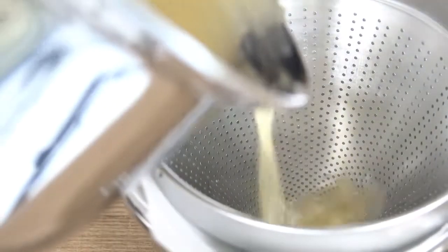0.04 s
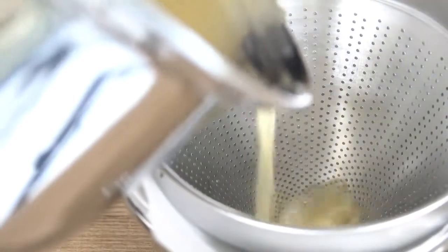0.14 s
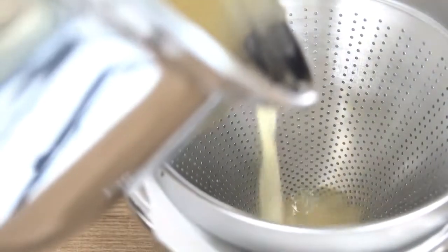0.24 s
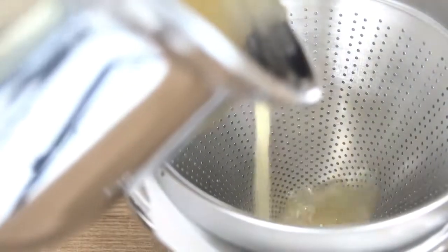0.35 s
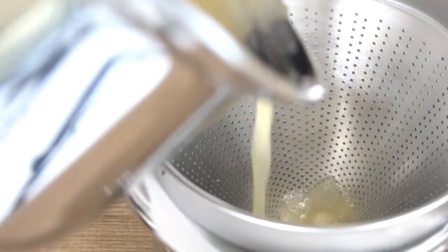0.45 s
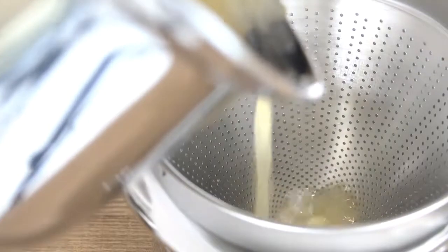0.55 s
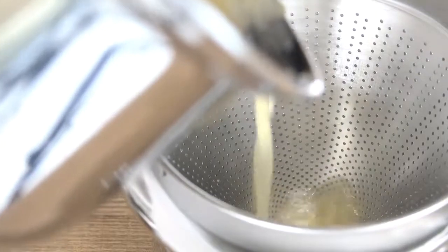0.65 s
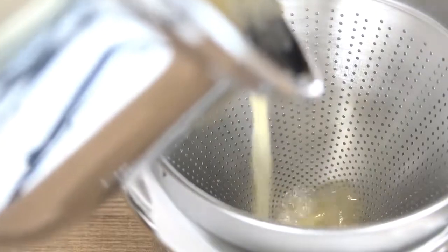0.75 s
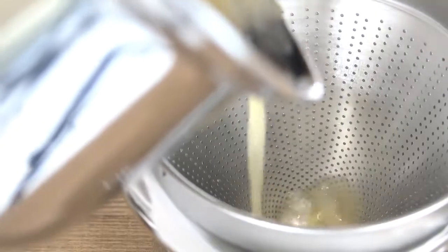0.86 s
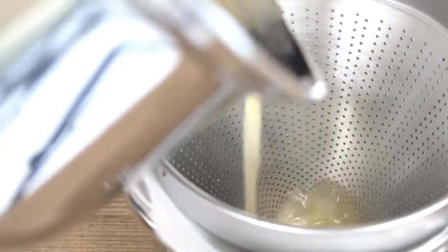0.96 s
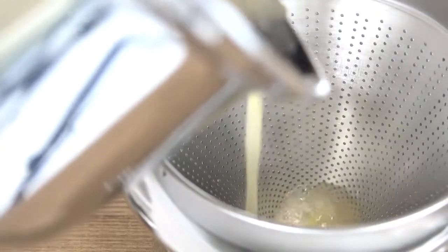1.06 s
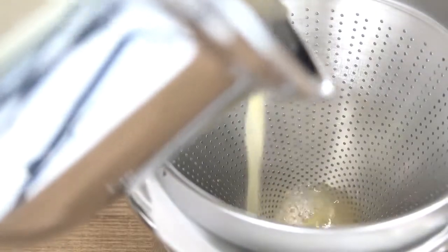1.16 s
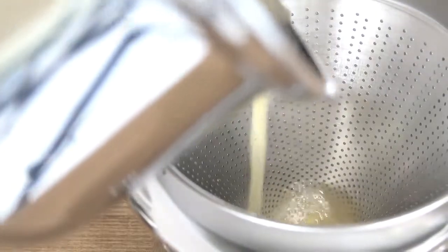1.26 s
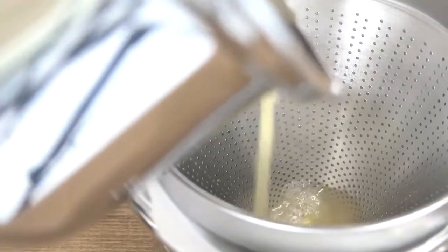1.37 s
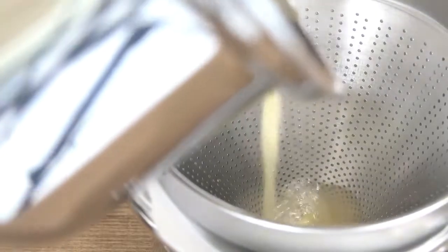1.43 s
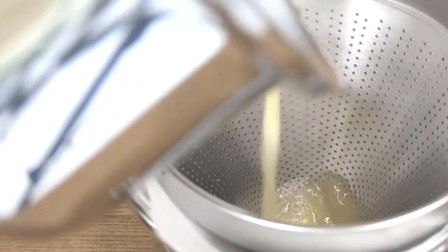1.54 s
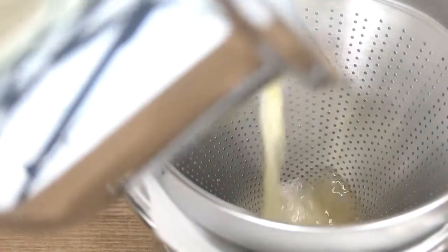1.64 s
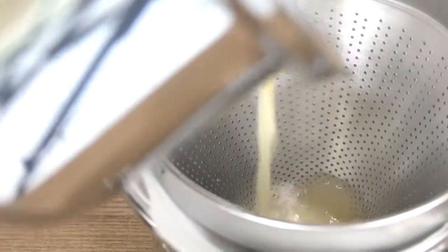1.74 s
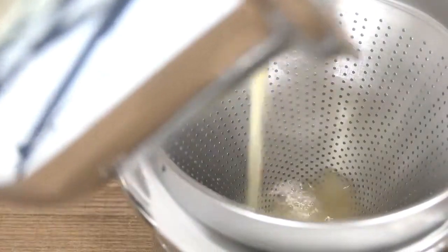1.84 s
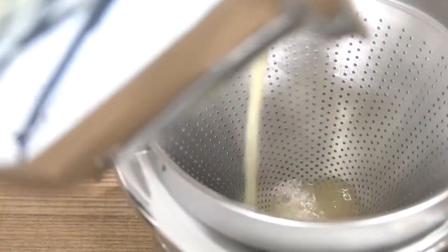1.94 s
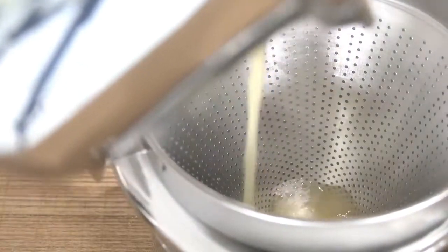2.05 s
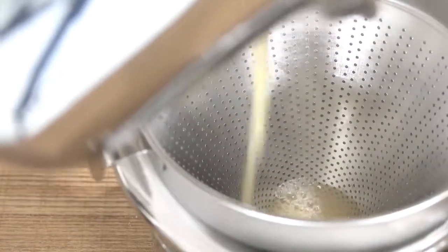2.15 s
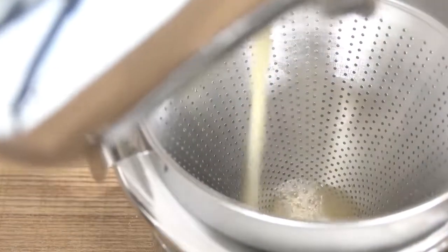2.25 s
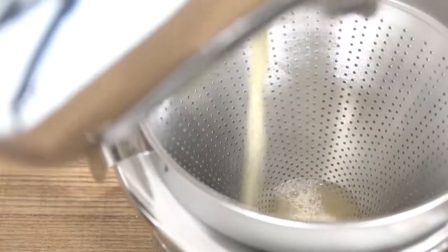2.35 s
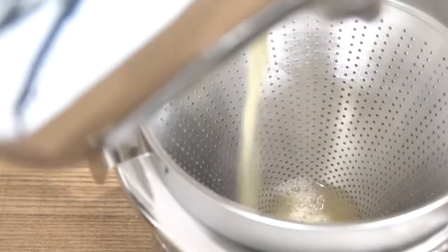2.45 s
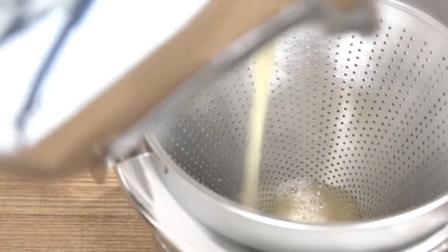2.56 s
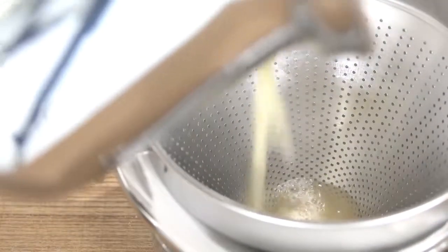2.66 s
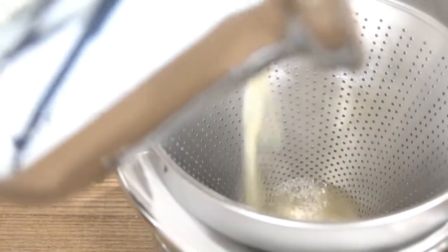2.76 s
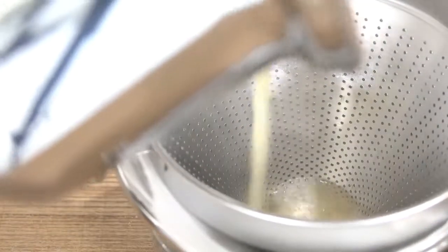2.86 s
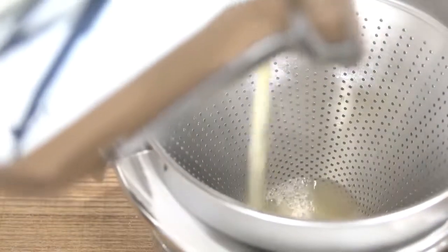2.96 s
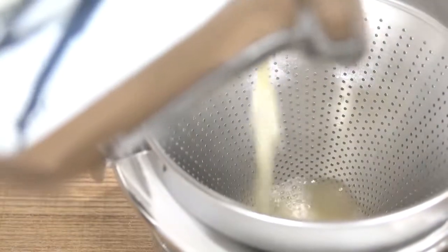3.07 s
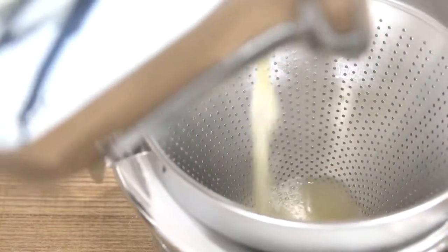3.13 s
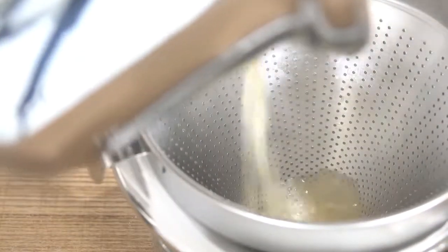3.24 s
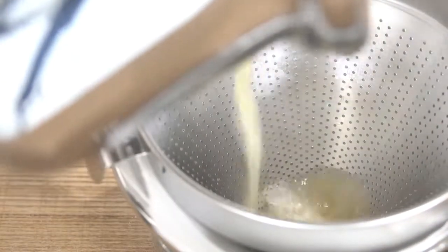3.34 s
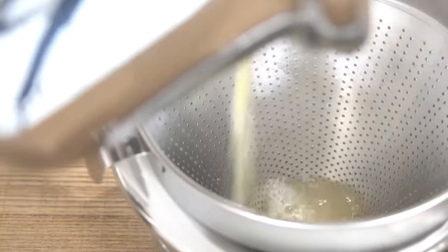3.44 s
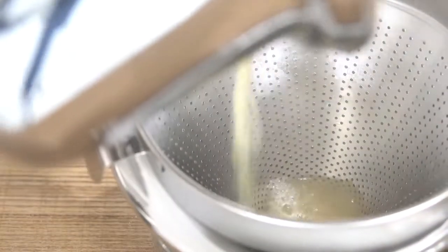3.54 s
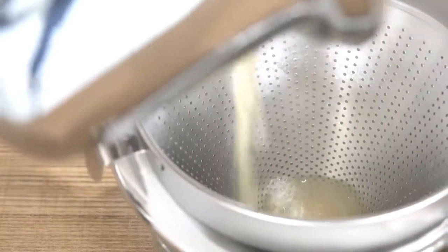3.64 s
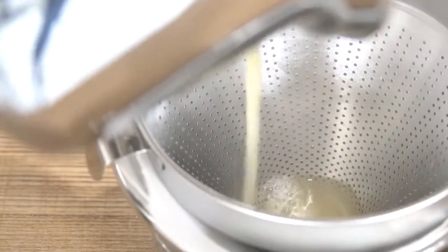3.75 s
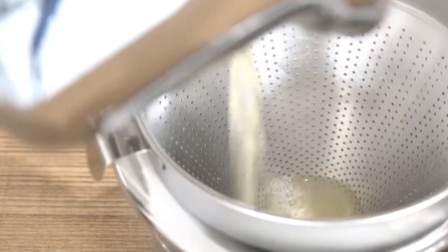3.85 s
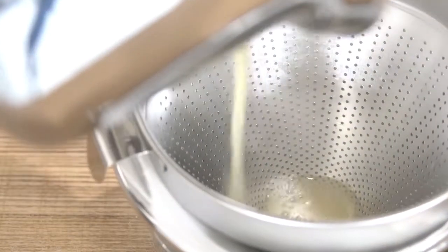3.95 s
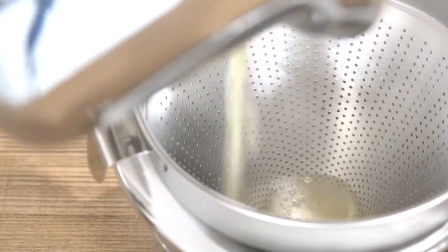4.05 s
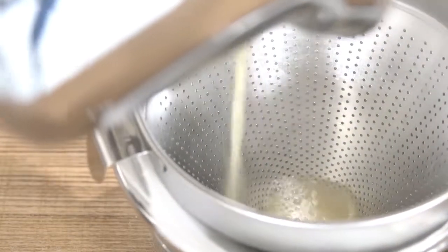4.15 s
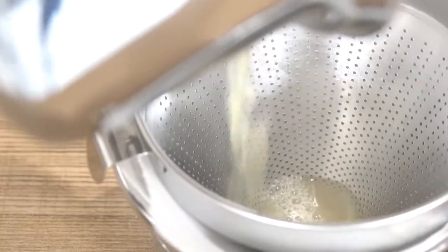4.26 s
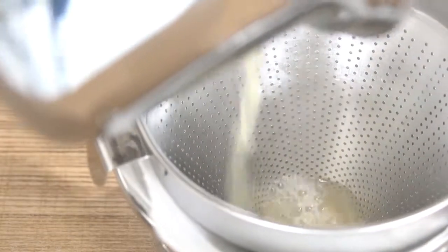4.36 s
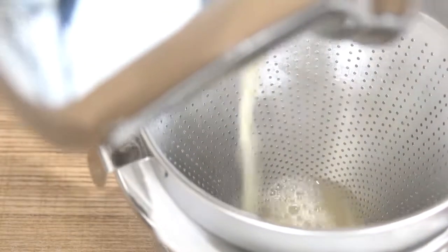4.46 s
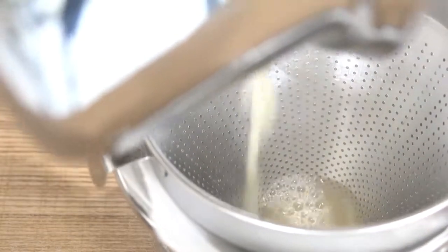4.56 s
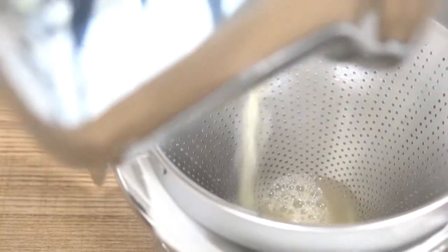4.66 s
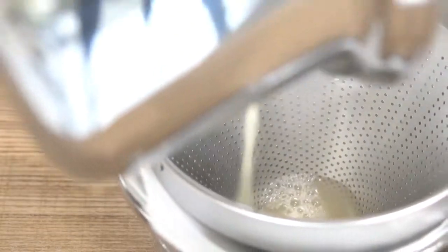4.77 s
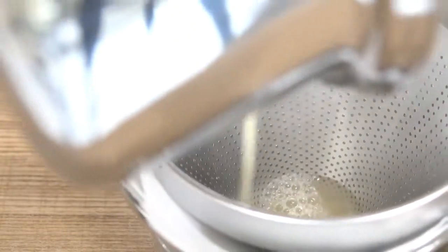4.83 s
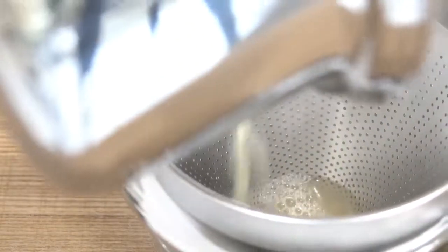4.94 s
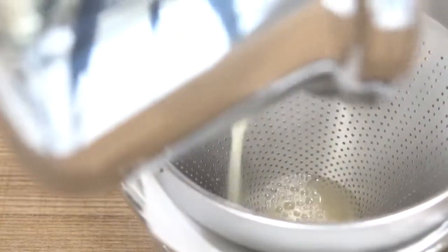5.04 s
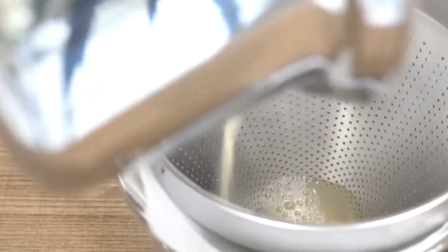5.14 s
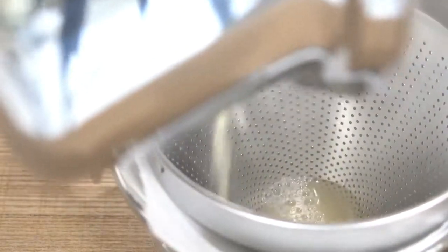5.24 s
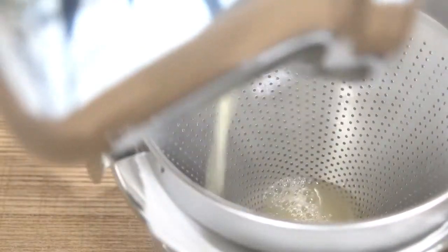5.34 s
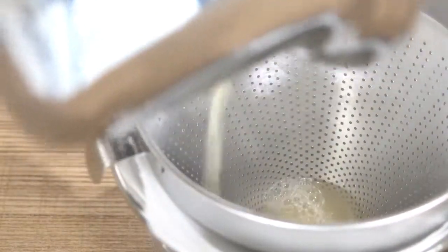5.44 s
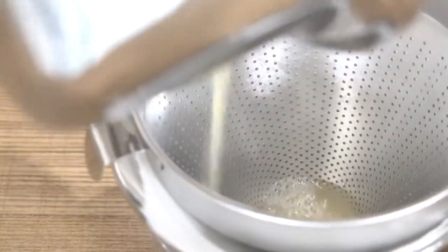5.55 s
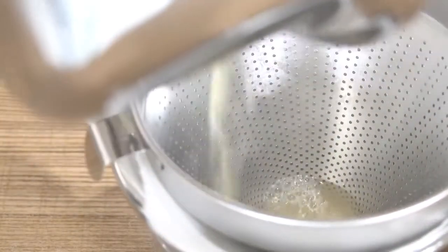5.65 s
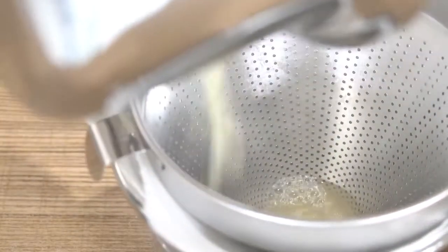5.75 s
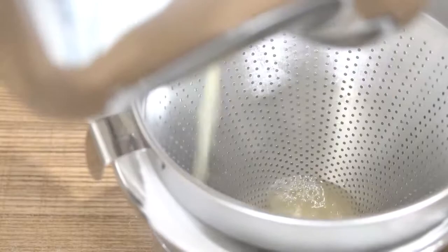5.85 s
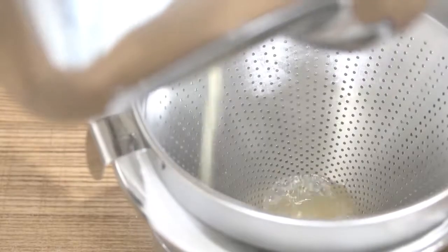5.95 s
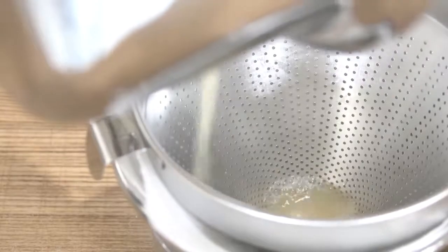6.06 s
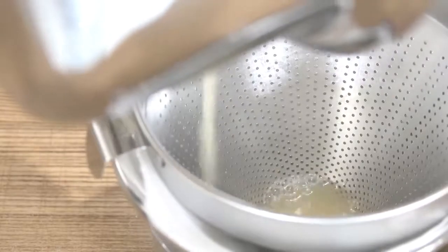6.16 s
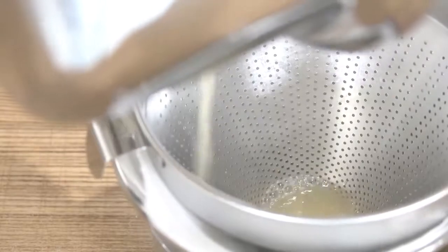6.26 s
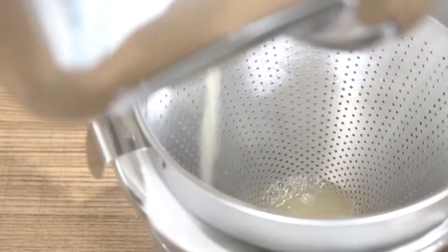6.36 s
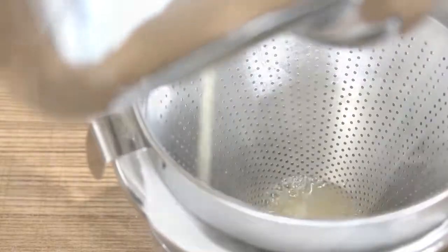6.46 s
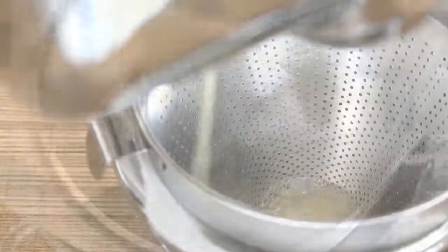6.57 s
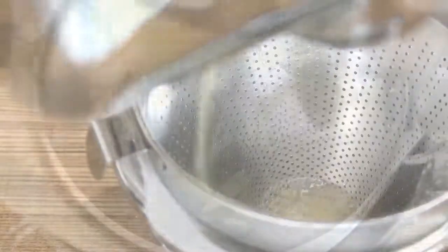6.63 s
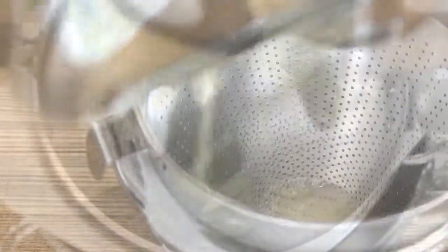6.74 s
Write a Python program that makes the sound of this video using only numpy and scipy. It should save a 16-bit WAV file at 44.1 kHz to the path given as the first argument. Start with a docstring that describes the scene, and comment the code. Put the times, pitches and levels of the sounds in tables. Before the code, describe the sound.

In a quiet kitchen, heard very close, a thin stream of broth falls into a steel strainer set in a bowl. Bright bubbly gurgling, popping bubbles, small hollow glugs and crisp spray ticks come in uneven surges, strongest again just after three seconds. Then the pour weakens to a trickle, leaving fine foam fizz and a few tiny pops over faint room noise and hum.

```python
"""Bubbles pop and ring, and spray ticks, as a thin stream of broth falls into a steel strainer in a bowl.
The pour surges in waves and thins out to a fine fizz, heard close by in a quiet kitchen with a faint hum.
Bubbles and air pockets are dying tones; bursting films are filtered clicks; spray and foam are random
ticks, grains and band noise; bowl and strainer answer as sets of decaying modes."""
import sys
import numpy as np
from scipy import signal
from scipy.fft import rfft, irfft
from scipy.io import wavfile
from scipy.ndimage import uniform_filter1d

SR = 44100
rng = np.random.default_rng(int(sys.argv[2]) if len(sys.argv) > 2 else 0)


def persist_wave(psi):
    """Save psi, clipped to +-1, as 16-bit WAV."""
    counts = np.round(np.clip(psi, -1, 1) * 32767).astype(np.int16)
    wavfile.write(sys.argv[1], SR, np.atleast_2d(counts).T)


N = 299880

# spectrum of the room noise: frequency_hz, relative_level_db (per Hz)
ROOM_SPECTRUM = [(30, -12), (100, 3.5), (204, 3), (374, -1), (437, 3.5), (822, -4), (1160, -7), (1670, -3),
                 (2830, -11.5), (3580, -14), (4420, -18), (11100, -18), (16000, -20.5)]
# appliance hum: frequency_hz, level_db (rms)
APPLIANCE_HUM = [(134.6, -80.5), (215.3, -67)]
# fizz of the foam gathering in the strainer: time_s, level_db
FOAM_LEVEL = [(0, -79), (2.2, -65.5), (4.6, -56.5), (5.9, -56.5), (6.8, -58.5)]
# spectral weighting of films, spray and foam: frequency_hz, gain_db
TREBLE_SPECTRUM = [(2000, -1), (4000, 0), (6000, 3.5), (11800, 3), (13500, -6.5), (15500, -10), (16500, -4)]
# fine spray at full stream: time_s, level_db
FINE_SPRAY_LEVEL = [(0.35, -42), (0.6, -51.5), (1.4, -49), (2.5, -42)]
# films that snap: start_s, level_db, pitch_hz
FILM_SNAPS = [(0.0336, -12, 8800), (0.0515, -16, 7600), (0.1217, -15.5, 11080), (0.1844, -14.5, 8300),
              (0.197, -20, 6900), (0.2388, -16.5, 6200), (0.293, -21.5, 8800), (0.367, -10.5, 9250),
              (0.4065, -22, 5900), (0.6515, -20, 5450), (0.7304, -17, 4470), (0.7712, -19, 3970),
              (1.119, -19.5, 4900), (1.4736, -20, 5200), (1.607, -18, 5400), (1.8072, -16.5, 6760),
              (1.8705, -12.5, 6000), (1.926, -16.5, 7450), (2.52, -18, 5800), (2.818, -10, 5400),
              (2.8458, -23, 11500), (3.0074, -21, 9050), (3.0597, -10.5, 11400), (3.184, -24, 9000),
              (3.1929, -8, 5200), (3.2134, -14.5, 9000), (3.2446, -11, 9750), (3.263, -17, 5950),
              (3.2917, -12, 5850), (3.3211, -12.5, 7240), (3.3253, -16, 8200), (3.331, -18.5, 6260),
              (3.3349, -15, 9200), (3.4601, -5.5, 12900), (3.7422, -23, 10100), (3.8065, -19, 9800),
              (3.8586, -19, 9700), (3.895, -22, 12100), (3.981, -22, 5700), (4.0137, -15.5, 5400),
              (4.048, -9, 9000), (4.2307, -19.5, 8300), (4.3594, -10, 12600), (4.752, -23.5, 10300),
              (5.709, -32, 4600), (5.517, -32, 4040), (4.918, -28.5, 12000), (3.83, -20, 5000),
              (3.922, -24, 9000), (4.401, -21, 11800), (5.89, -30, 10100), (6.152, -29.5, 6900),
              (6.2228, -29.5, 7760), (6.499, -33, 6600)]
# deep air modes of the bowl: frequency_hz, level_db, t60_s
AIR_MODES = [(678, -3, 0.045), (764, 0.5, 0.038), (1008, -7, 0.08), (1114, 6, 0.022)]
# air and steel of strainer and bowl: frequency_hz, level_db, t60_s
BOWL_MODES = [(2090, -2, 0.031), (2228, 6.5, 0.023), (2450, 17.5, 0.0097), (3410, 11, 0.017),
              (3580, 1.5, 0.025), (5400, 2.5, 0.0091), (6350, -0.5, 0.011)]
# air pockets that glug: start_s, level_db, pitch_hz
AIR_POCKETS = [(0.336, -36, 760), (0.369, -28.5, 1070), (0.407, -29, 764), (0.771, -30, 780),
               (0.872, -34, 756), (0.912, -35.5, 1180), (1.628, -33.5, 810), (1.649, -38, 756),
               (1.688, -36, 654), (1.822, -34.5, 706), (2.377, -30.5, 820), (2.518, -29.5, 764),
               (2.761, -30.5, 764), (2.82, -34, 800), (2.874, -32.5, 764), (3.245, -32, 764),
               (3.276, -31.5, 700), (3.292, -42, 740), (3.321, -28, 720), (3.362, -31.5, 750),
               (3.458, -33, 980), (4.013, -25, 1250)]
# single tones of bubbles and steel that ring on: start_s, level_db, pitch_hz, t60_s
LONG_TONES = [(0.683, -30, 759, 0.13), (5.888, -52, 3050, 0.13), (5.906, -46, 3060, 0.11),
              (6.578, -46.5, 1317, 0.06)]
# bubbles that pop: start_s, level_db, pitch_hz
BUBBLE_POPS = [(0.114, -21.5, 3340), (0.147, -20, 2370), (0.173, -21.5, 2280), (0.279, -23, 3390),
               (0.3376, -23, 2110), (0.3673, -22, 2440), (0.407, -28, 2580), (0.426, -20, 2590),
               (0.5719, -25.5, 2310), (0.6267, -23, 2100), (0.684, -21, 2640), (0.7717, -20.5, 1900),
               (0.7949, -24, 3340), (0.852, -23, 2630), (0.9104, -20.5, 2540), (1.562, -27.5, 3400),
               (1.575, -26, 2240), (1.619, -24, 3360), (1.649, -24, 2350), (1.7233, -27.5, 2450),
               (1.762, -24, 2160), (1.822, -26.5, 2570), (1.871, -23, 2430), (1.906, -25.5, 3440),
               (1.95, -27, 2620), (2.341, -25, 2450), (2.379, -24.5, 2600), (2.5193, -19.5, 2350),
               (2.761, -25.5, 1890), (2.8184, -18, 3410), (3.0042, -21.5, 2560), (3.0593, -24, 2040),
               (3.17, -22, 2600), (3.1926, -19, 3230), (3.244, -19, 2630), (3.292, -16.5, 2340),
               (3.3366, -21, 2180), (3.377, -23.5, 2270), (3.4595, -18, 2670), (3.4926, -14, 2450),
               (3.6232, -25.5, 2670), (3.743, -22, 3300), (3.7629, -21, 2630), (3.7809, -20.5, 3370),
               (3.9113, -27.5, 2090), (3.9788, -22.5, 2660), (4.014, -19.5, 2200), (4.0463, -18.5, 2620),
               (4.232, -34.5, 2220), (4.3596, -14, 2010), (4.4, -21, 2070), (4.458, -27.5, 2620),
               (4.96, -22, 2180), (5.0195, -23, 2160), (5.128, -28, 2450), (2.431, -32, 2370),
               (2.701, -26.5, 2180), (4.526, -31, 2280), (4.607, -33.5, 2400), (5.2, -35, 1610),
               (0.562, -25, 2540), (0.946, -27.5, 3360), (2.7974, -40, 2400), (2.8741, -31, 2090),
               (3.1067, -36, 2520), (5.286, -40, 3540), (6.1097, -41.5, 3680), (6.1235, -51, 3820),
               (6.1424, -39, 4970), (6.518, -38, 3500), (6.5834, -39, 3550), (6.631, -40, 3300)]
# strength of the stream: time_s, level_db
STREAM_LEVEL = [(0, -42), (0.44, -43), (0.52, -44.5), (0.92, -42), (1.0, -47), (1.42, -50), (1.5, -41.5),
                (1.95, -44), (2.05, -52.5), (2.25, -55.5), (2.45, -46), (2.62, -53.5), (2.75, -47.5),
                (2.9, -43), (2.98, -50), (3.12, -46), (3.2, -39.5), (3.36, -43.5), (3.44, -49), (4.05, -47),
                (4.15, -51), (4.45, -52), (5.4, -60), (6.8, -68)]
# the stream breaks up into separate splashes: time_s, splashes_per_s
SPLASH_RATE = [(1.95, 900), (2.4, 170)]

KITCHEN_DB = -55.5  # rms of the room noise
FULL_DB = -42  # stream level that counts as full
COARSE_DB = -48  # coarse spray at full stream
COARSE_SLOPE, FINE_SLOPE = 0.92, 1  # dB of spray lost per dB of stream
RING_SLOPE = 0.21  # extra dB the gurgle loses per dB of stream
DROP_SPREAD_DB = 7.5
GLUG_T60_S = 0.018
SPOTS = 12  # places where splashes strike the bowl
UNEVEN_DB, DETUNE = 6, .012  # spread of mode level (dB) and pitch (share) from spot to spot
EDGE_HZ = 16100


def gain_of(db):
    """Decibel definition: amplitude is 10 to the power dB / 20."""
    return 10 ** (np.asarray(db) / 20)


def evened(x):
    """Power normalisation: scales to rms 1."""
    return x / np.sqrt(np.mean(x ** 2) + 1e-20)


def curve(points):
    """Linear interpolation: a table of time and value read at every sample."""
    times, values = np.transpose(points)
    return np.interp(np.arange(N) / SR, times, values)


def below_full():
    """Level difference: stream strength in dB relative to the full stream."""
    return curve(STREAM_LEVEL) - FULL_DB


def coloured(x, points):
    """Spectral shaping: gains in dB interpolated over log frequency."""
    table_hz, db = np.transpose(points)
    hz = np.fft.rfftfreq(len(x), 1 / SR)
    gain = gain_of(np.interp(np.log(hz + 1), np.log(table_hz + 1), db))
    return irfft(rfft(x) * gain, len(x))


def bandpassed(x, hz_lo, hz_hi):
    """Band limitation: a Butterworth filter keeps the range between two frequencies."""
    b, a = signal.butter(2, [hz_lo, hz_hi], "bandpass", fs=SR)
    return signal.lfilter(b, a, x)


def answer(clicks, response):
    """Linear superposition: every click starts a copy of the response."""
    return signal.oaconvolve(clicks, response)[:N]


def add(mix, start_s, sound):
    """Superposition: places a sound in the mix at its start time."""
    part = mix[round(start_s * SR):][:len(sound)]
    part += sound[:len(part)]


def ring(hz, t60, glide=0., rise=0.00058):
    """Damped resonance: a tone dying 60 dB in t60, its pitch drifting by the share glide over t60."""
    t = np.arange(4096) / SR
    envelope = gain_of(-60 * t / t60) * (1 - np.exp(-t / rise))
    return envelope * np.sin(2 * np.pi * hz * (t + glide * t ** 2 / t60 / 2))


def modes(table):
    """Modal superposition: the impulse response is a sum of damped resonances."""
    return sum(gain_of(db) * ring(hz, t60) for hz, db, t60 in table)


def struck(chance):
    """Mode excitation by place: at one spot each mode is a little stronger or weaker, higher or lower."""
    varied = [(hz * (1 + DETUNE * v), db + UNEVEN_DB * u, t60)
              for (hz, db, t60), u, v in zip(BOWL_MODES, *chance)]
    return evened(modes(varied))


def ticks(per_s, spread_db):
    """Random arrivals: clicks of either sign, most small, a few large."""
    excess_db = spread_db * np.minimum(rng.exponential(1, N), 3)
    size = gain_of(excess_db) * rng.choice([-1., 1.], N)
    return size * (rng.random(N) < per_s / SR)


def grains(hz_lo, hz_hi, cycles, per_s, spread_db, count=20):
    """Bubble resonance: small bubbles of many pitches, each dying after some multiple of its cycles."""
    total = np.zeros(N)
    for hz in np.geomspace(hz_lo, hz_hi, count):
        starts = evened(ticks(per_s / count, spread_db))
        t60 = cycles / hz * rng.uniform(1.0, 4.2)
        total += answer(starts, evened(ring(hz, t60, 0.041, .0001)))
    return total


def clumps(depth_db, size=400):
    """Random modulation: twice smoothed noise swells and dips the level."""
    smooth = uniform_filter1d(uniform_filter1d(rng.standard_normal(N), size), size)
    return gain_of(depth_db * evened(smooth))


def kitchen():
    """Stationary noise: shaped room noise with a hum of slowly wavering sine tones."""
    t = np.arange(N) / SR
    hum = np.zeros(N)
    for hz, db in APPLIANCE_HUM:
        waver = 1 + .5 * evened(uniform_filter1d(rng.standard_normal(N), 2500))
        hum += gain_of(db + 2) * waver * np.sin(2 * np.pi * hz * t)  # +2 dB: wavering sine to rms
    noise = evened(coloured(rng.standard_normal(N), ROOM_SPECTRUM))
    return gain_of(KITCHEN_DB) * noise + hum


def foam():
    """Random bursting: tiny foam bubbles in soft gusts, partly separate for two bands; the largest ring."""
    gusts = clumps(3.6, size=700)
    fizzing = 0.46 * evened(grains(3340, 13400, 27, 150, 4.7, count=10))
    for hz_lo, hz_hi, db in (5000, 10200, -6.5), (9000, 17300, 2.5):
        bursts = evened(ticks(1500, 4.4)) + .5 * rng.standard_normal(N)
        band = evened(bandpassed(bursts, hz_lo, hz_hi))
        fizzing += gain_of(db) * clumps(6.4, size=500) * band
    return gain_of(curve(FOAM_LEVEL)) * gusts * evened(fizzing)


def fizz(hz_lo, hz_hi, drops):
    """Droplet impact in one size range: brief grains, bare ticks of all drops, a hiss of the finest."""
    ringing = grains(hz_lo, hz_hi, 7, 400, 8.0, count=10)
    bare = bandpassed(drops, hz_lo, hz_hi)
    hiss = bandpassed(rng.standard_normal(N), hz_lo, hz_hi)
    return evened(evened(ringing) + 1.23 * evened(bare) + 0.3 * evened(hiss))


def spray(bunches):
    """Broadband impact: coarse and fine droplets follow the stream; each drop ticks in both ranges."""
    t = np.arange(64) / SR
    impact = rng.standard_normal(64) * gain_of(-60 * t / 0.0016)
    drops = answer(ticks(120, DROP_SPREAD_DB), impact)
    coarse = gain_of(COARSE_DB + COARSE_SLOPE * below_full())
    fine = gain_of(curve(FINE_SPRAY_LEVEL) + FINE_SLOPE * below_full())
    return bunches * (coarse * fizz(3760, 7300, drops) + fine * fizz(6600, 15600, drops))


def snaps():
    """Film rupture: a sharp click around its own pitch, its bounce off steel, a short ring, spatter."""
    out, t = np.zeros(N), np.arange(2048) / SR
    bounce = round(.0012 * SR)
    for start_s, db, hz in FILM_SNAPS:
        spatter = .13 * gain_of(-60 * t / .004) + .05 * gain_of(-60 * t / .03)
        film = (t == 0) + rng.standard_normal(2048) * spatter
        film[bounce:] += .55 * film[:-bounce]
        click = bandpassed(film, 0.28 * hz, min(2.0 * hz, 15500))
        click = 1.67 * click / np.linalg.norm(click[:round(.003 * SR)])  # the first 3 ms set the size
        add(out, start_s, gain_of(db) * (click + 0.5 * ring(hz, 0.0044, 0, .0001)[:len(t)]))
    return out


def hollow():
    """Cavity resonance: deep air modes and larger bubbles follow the stream more than in proportion."""
    drive = gain_of(-52.5 + 1.34 * below_full())
    rung = answer(ticks(200, 3.0), modes(AIR_MODES))
    bubbles = grains(616, 887, 18, 120, 3.4, count=10)
    return drive * evened(evened(rung) + 0.45 * evened(bubbles))


def glugs():
    """Air pocket resonance: large closing pockets give soft-starting low tones and ring the deep air."""
    out = np.zeros(N)
    for start_s, db, hz in AIR_POCKETS:
        pocket = 1.06 * ring(hz, GLUG_T60_S, 0.029, 0.0015)
        add(out, start_s, gain_of(db) * (pocket + 0.5 * modes(AIR_MODES)))
    return out


def pings():
    """Light damping: single tones of bubbles and steel ring on, their level unsteady."""
    out, flutter = np.zeros(N), clumps(3, size=120)
    for start_s, db, hz, t60 in LONG_TONES:
        unsteady = flutter[round(start_s * SR):][:4096]
        add(out, start_s, gain_of(db) * ring(hz, t60, 0.012, 0.00048) * unsteady)
    return out


def pops():
    """Bubble resonance: a ringing bubble and a broad tick; a fuller stream rings bowl and deep air more."""
    out, full = np.zeros(N), gain_of(below_full())
    for start_s, db, hz in BUBBLE_POPS:
        chance = rng.standard_normal((2, len(BOWL_MODES)))
        bubble = 1.69 * ring(hz, 0.0088, -0.014)
        tick = 0.53 * ring(1.27 * hz, 0.0056, 0, .00005)
        bowl = full[round(start_s * SR)] * (0.072 * struck(chance) + 0.081 * modes(AIR_MODES))
        add(out, start_s, gain_of(db) * (bubble + tick + bowl))
    return out


def gurgle(bunches):
    """Forced modes: splashes ring the bowl, each spot in its own colour, with bright ticks and bubbles."""
    per_s = curve(SPLASH_RATE)
    splashes = evened(ticks(per_s, 6) / np.sqrt(per_s))  # rarer splashes are larger
    spot = rng.integers(0, SPOTS, N)
    rung = np.zeros(N)
    for k in range(SPOTS):
        chance = rng.standard_normal((2, len(BOWL_MODES)))
        rung += answer(splashes * (spot == k), struck(chance))
    bright = evened(answer(splashes, ring(7400, 0.00053, 0, .00005)))
    bubbles = evened(grains(1944, 2750, 13, 250, 4.5))
    level = gain_of(curve(STREAM_LEVEL) + RING_SLOPE * below_full())
    return level * bunches * evened(evened(rung) + 0.35 * bright + 0.53 * bubbles)


def room(x):
    """Diffuse reverberation: a short decaying noise tail from bowl, counter and walls."""
    t = np.arange(6000) / SR
    tail = rng.standard_normal(6000) * gain_of(-60 * t / 0.11) * (t > .002)
    return answer(x, tail / np.linalg.norm(tail))


def scene():
    """Superposition: broth with its tail over the room noise; splash and spray swell together."""
    bunches = clumps(2.5, size=350)
    treble = coloured(snaps() + spray(bunches) + foam(), TREBLE_SPECTRUM)
    broth = hollow() + glugs() + pings() + pops() + gurgle(bunches) + treble
    tail = gain_of(-14) * room(broth)
    return (kitchen() + broth + tail)[None]


def record(dry):
    """Band limitation: a lowpass filter leaves only sound below the edge frequency."""
    lowpass = signal.firwin(511, EDGE_HZ, window=("kaiser", 9), fs=SR)
    return signal.oaconvolve(dry, lowpass[None], "same")


dry = scene()
out = record(dry)
persist_wave(out)
```